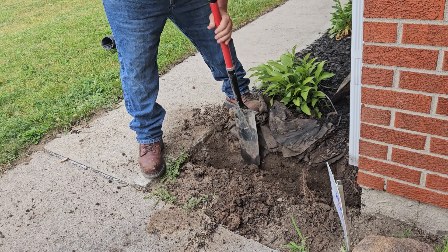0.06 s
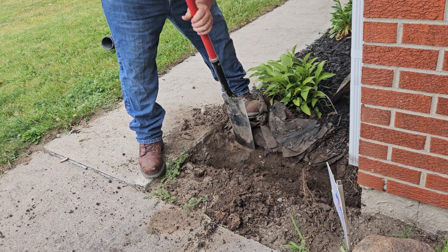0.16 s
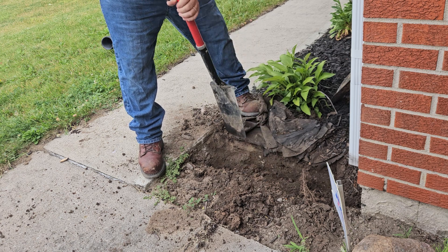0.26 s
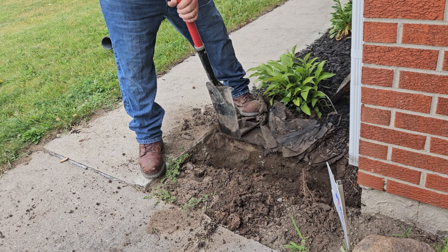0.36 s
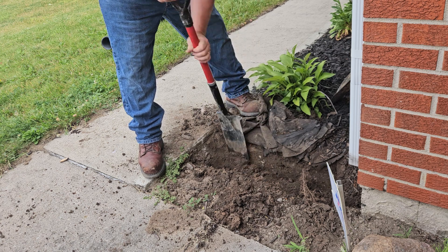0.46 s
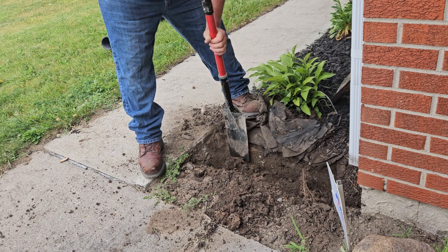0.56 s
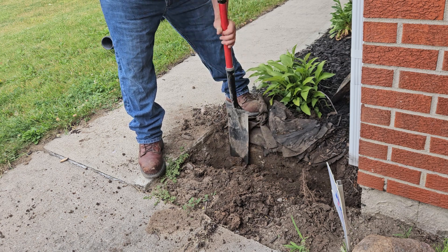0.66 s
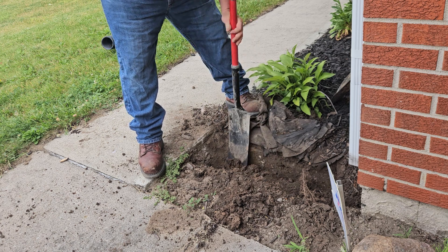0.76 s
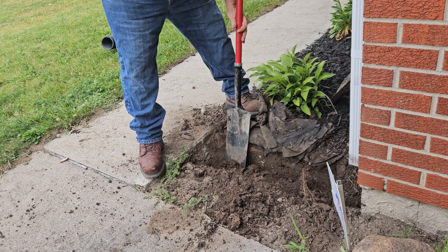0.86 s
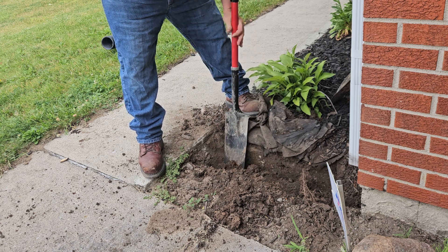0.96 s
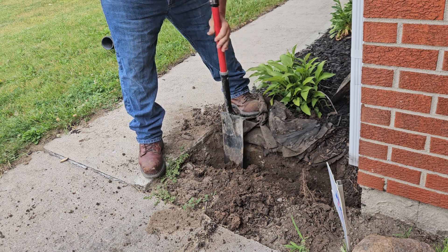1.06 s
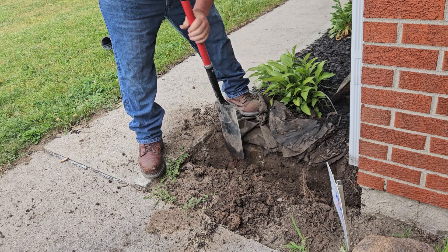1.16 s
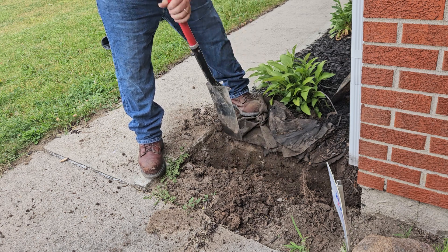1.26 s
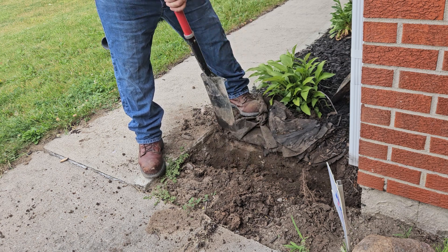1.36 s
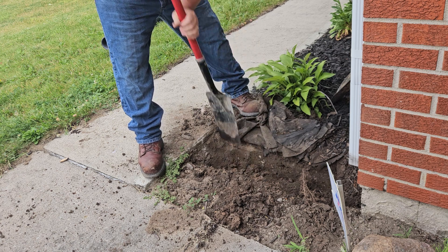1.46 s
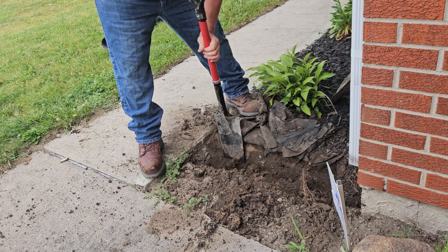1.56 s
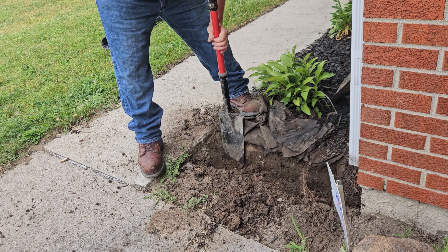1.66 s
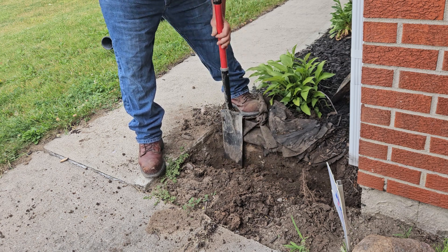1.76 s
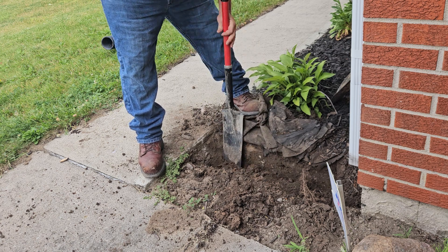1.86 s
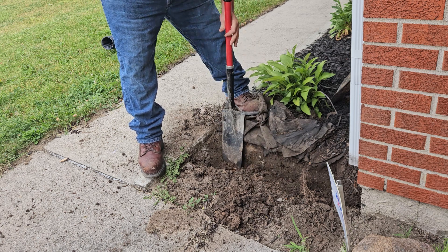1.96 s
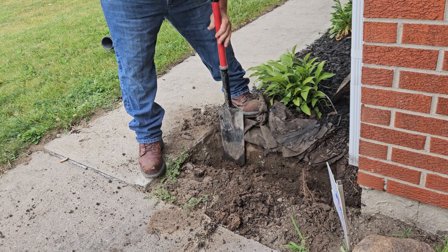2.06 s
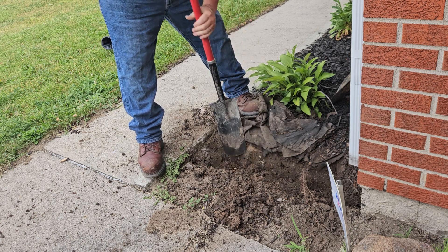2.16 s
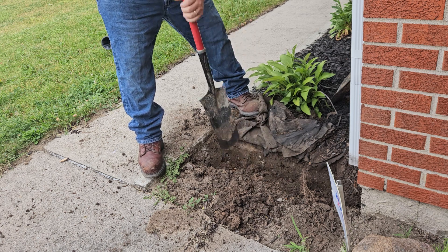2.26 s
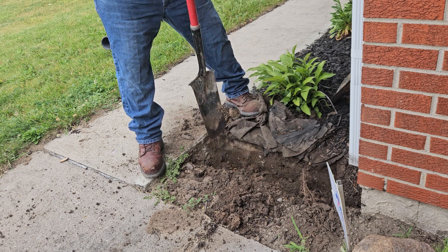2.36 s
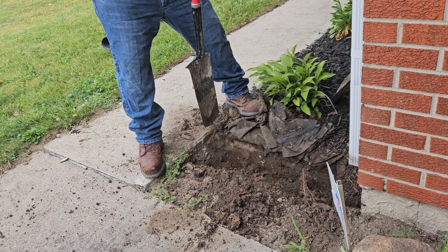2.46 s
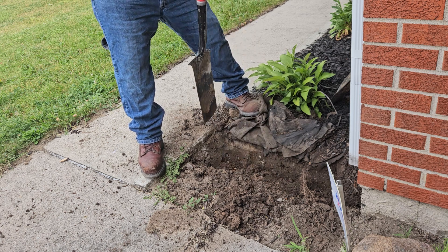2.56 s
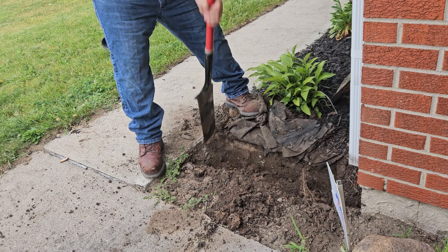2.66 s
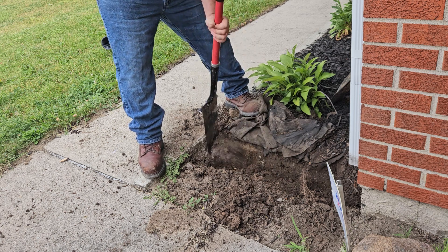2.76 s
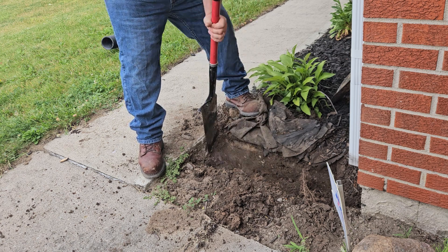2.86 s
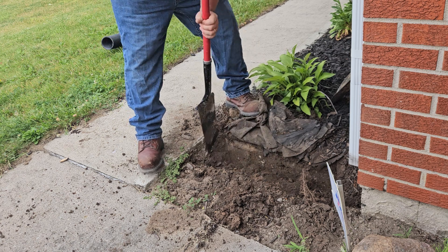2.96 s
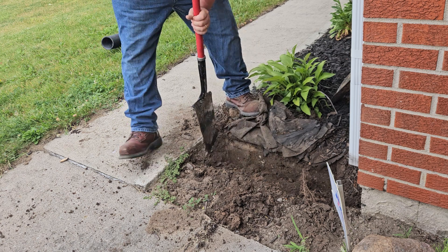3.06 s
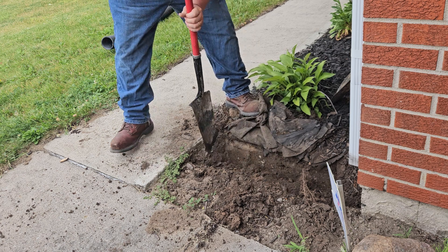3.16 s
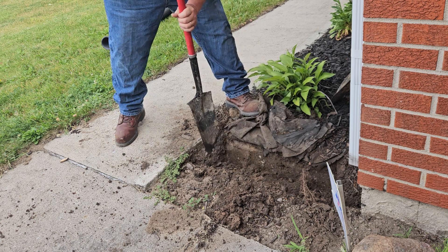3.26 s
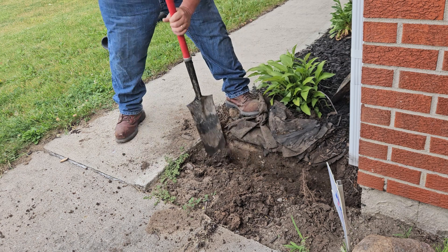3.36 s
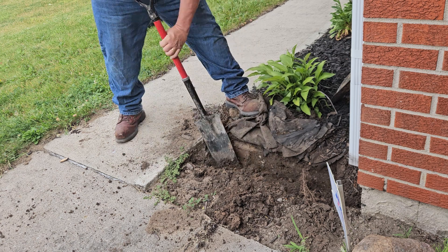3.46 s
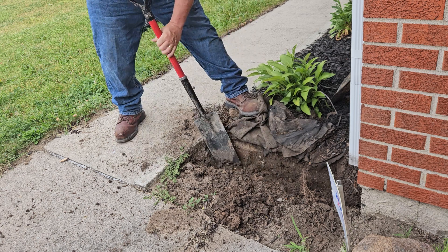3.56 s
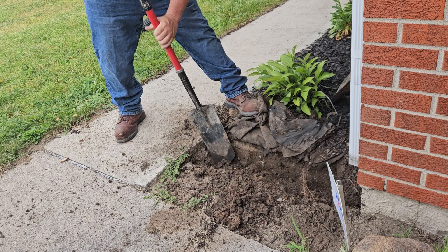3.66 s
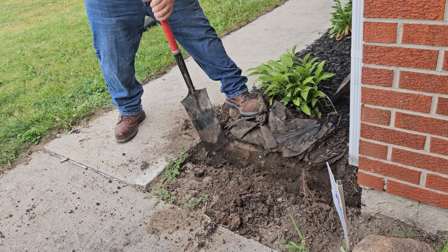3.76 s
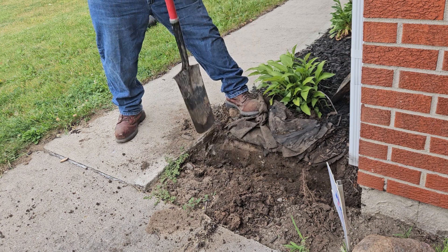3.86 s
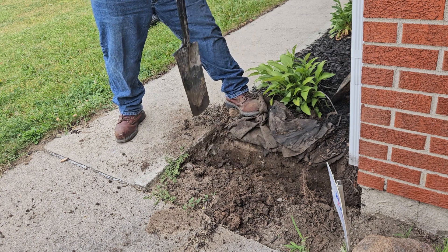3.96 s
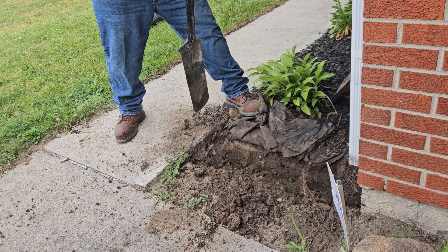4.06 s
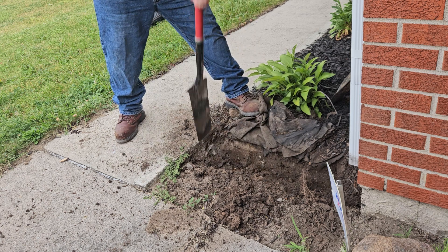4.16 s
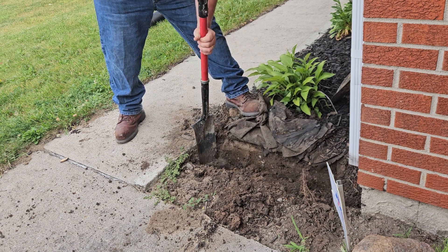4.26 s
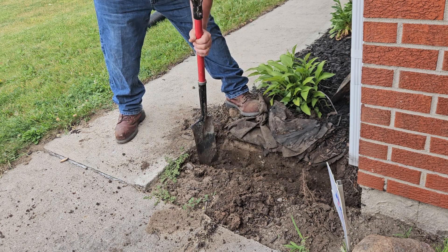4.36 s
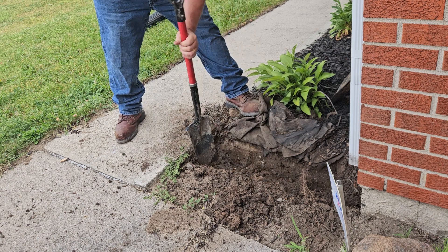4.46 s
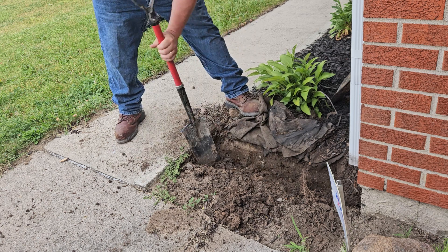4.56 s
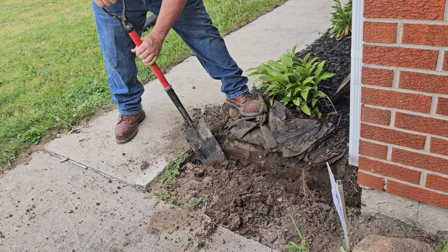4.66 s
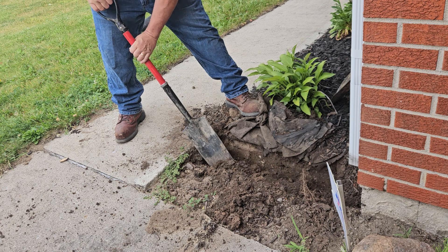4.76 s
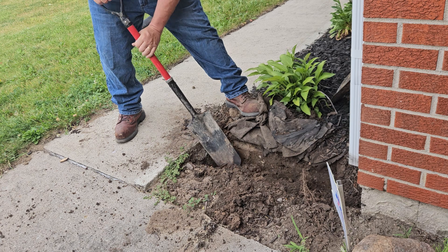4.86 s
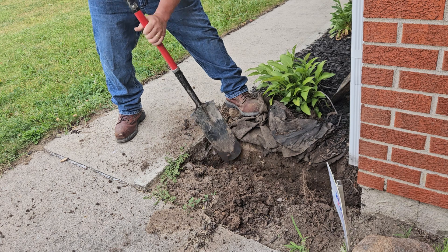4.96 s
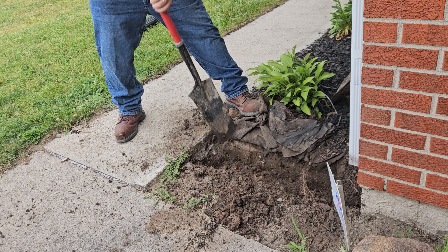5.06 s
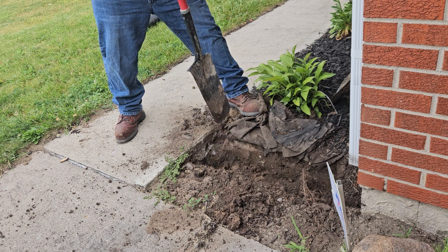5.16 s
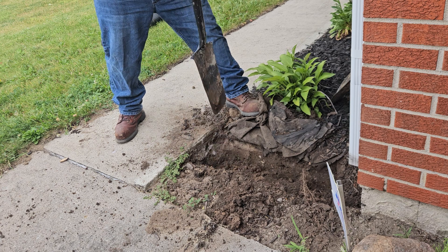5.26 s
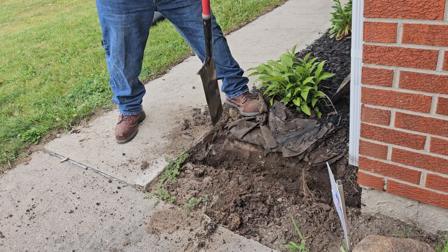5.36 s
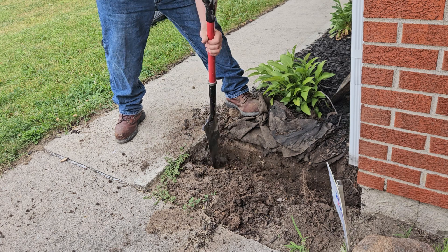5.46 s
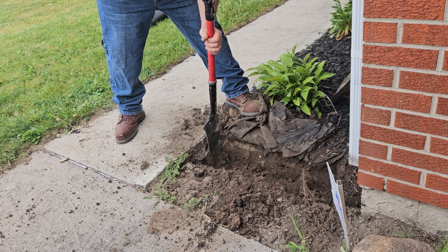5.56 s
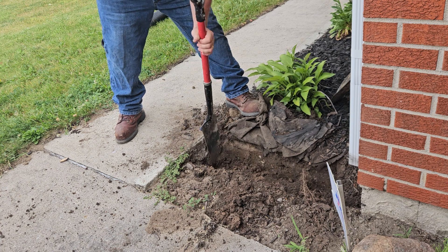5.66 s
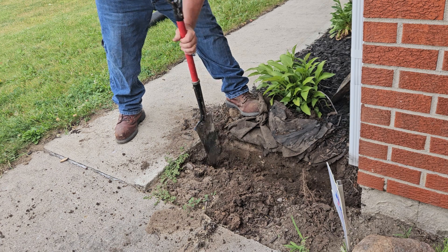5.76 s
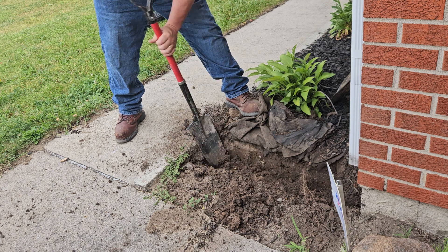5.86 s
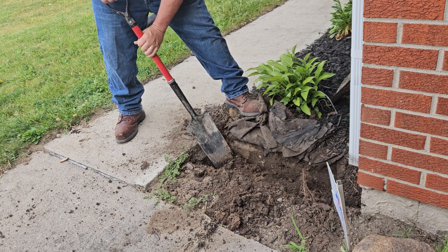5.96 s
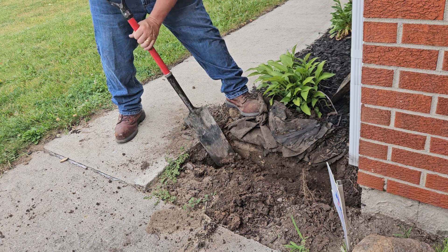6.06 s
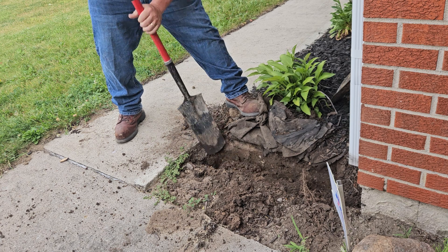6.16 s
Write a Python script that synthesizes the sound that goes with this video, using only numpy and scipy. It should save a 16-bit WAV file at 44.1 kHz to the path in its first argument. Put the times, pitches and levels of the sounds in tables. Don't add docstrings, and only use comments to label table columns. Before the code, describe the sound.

Five hard spade strikes in gritty soil, heard close up in stereo. The blade clanks briefly and dryly, stones tick against its edge, and the earth thumps beneath. Between strikes come small irregular scrapes, slips and crumbling soil, with quiet gaps. Two or three quick hoarse bird chirps appear midway, over soft fading traffic hiss, light leaf rustle and a barely audible hum.

```python
import sys
import numpy as np
from scipy import signal
from scipy.fft import rfft, irfft, next_fast_len
from scipy.io import wavfile
from scipy.ndimage import uniform_filter1d, map_coordinates

SR = 44100
rng = np.random.default_rng(int(sys.argv[2]) if len(sys.argv) > 2 else 0)


def dump(signal):
    limited = np.clip(np.atleast_2d(signal).T, -1, 1)
    pcm = np.round(limited * 32767).astype(np.int16)
    wavfile.write(sys.argv[1], SR, pcm)


def gain_from_db(level_db):
    decades = np.asarray(level_db, float) / 20
    return 10 ** decades


N = 273420

# time_s, level_db
ROAD_LEVEL = [(0, -55), (.64, -55), (2.95, -59.5), (3.38, -64.5), (3.899, -60.5), (4.37, -65.5),
              (4.7, -64.5), (5.13, -67), (6.2, -64)]
# frequency_hz, density_db
RUMBLE_SPECTRUM = [(12, -32), (20, -3.5), (107, -5), (140, -10.5), (201, -11), (222, -16.5), (296, -23.5),
                   (327, -21.5), (400, -35), (520, -64), (880, -120)]
# frequency_hz, density_db
HISS_SPECTRUM = [(150, -43), (250, -11.5), (334, -13.5), (516, -14), (555, -13), (821, -9), (909, -7),
                 (2140, -13.5), (2740, -16), (8000, -32), (10400, -75), (17600, -120)]
# frequency_hz, density_db
LEAF_SPECTRUM = [(2350, -31.5), (4000, 0), (5250, -14), (7660, -13.5), (8700, -22), (9440, -40),
                 (10800, -30), (11600, -9), (16000, -12)]
# time_s, level_db
LEAF_LEVEL = [(0, -77.5), (1.5, -74.5), (2.2, -70.5), (2.44, -70), (2.47, -54), (2.51, -70),
              (2.75, -73.5), (4.12, -73), (4.22, -66.5), (5.22, -73.5), (5.3, -88), (6.2, -78.5)]
# frequency_hz, density_db
HAZE_SPECTRUM = [(10600, -120), (11200, -6), (12000, 0), (15500, -2), (16400, -10)]
# pitch_hz, level_db
MACHINE_HUM = [(195, -67.5)]
# frequency_hz, correlation (-1 to 1)
LIKENESS = [(60, 0.99), (180, 0.88), (550, 0.2), (1650, -0.31), (4970, -0.47), (15000, -0.92)]
RUMBLE_DB, RUMBLE_FOLLOWS = -55.5, 0.64

# start_s, length_s, top_hz, held_share, level_db
CHIRPS = [(2.435, 0.063, 5520, 0.34, -50.5), (2.513, 0.059, 4900, 0.15, -50.5),
          (3.762, 0.075, 5380, 0.3, -51), (3.841, 0.07, 4850, .3, -55), (4.177, 0.074, 5500, .38, -52),
          (4.25, 0.045, 4900, .1, -55.5)]
# start_s, length_s, from_hz, to_hz, level_db
PEEPS = [(2.52, 0.043, 3700, 4100, -56), (2.478, .022, 4480, 3700, -58), (3.855, 0.044, 3650, 3820, -60),
         (1.462, 0.12, 5100, 5450, -71), (2.417, 0.086, 6670, 5950, -69), (2.468, 0.13, 5470, 5400, -68.5),
         (2.585, 0.031, 3200, 3050, -62), (2.648, 0.081, 4930, 4700, -70.5), (4.073, .06, 2295, 2144, -75),
         (4.17, 0.09, 6290, 5700, -65), (5.405, .025, 5170, 5340, -81)]
CHIRP_ENDS_HZ, CHIRP_START_DB, CHIRP_DROPPED_DB, CHIRP_END_DB = 3500, -10, -3, -14
DROP_AT, DROP_TAKES = 0.6, 0.12

# start_s, peak_db, t60_s, brightness_db (350-900 Hz re peak)
THUMPS = [(0.544, -30, 0.16, -5.5), (0.801, -50, 0.19, -6), (0.869, -44, 0.12, -4.5),
          (1.602, -24.5, 0.11, -4.5), (1.909, -53.5, 0.37, 4.5), (1.951, -58.5, 0.51, -1),
          (2.219, -66, 0.13, -6), (2.775, -22, 0.15, -6), (3.098, -56, 0.13, -5), (3.301, -48, 0.49, -32),
          (3.348, -40.5, 0.18, -7.5), (3.43, -39, 0.18, -21), (3.471, -45, 0.15, -6),
          (3.509, -59, 0.18, 13), (3.554, -39, 0.079, 3), (4.294, -24.5, 0.15, -6),
          (4.627, -55.5, 0.69, 3.5), (4.707, -45.5, 0.068, 7.5), (4.829, -52.5, 0.18, 1),
          (4.879, -62, 0.33, 8), (5.541, -30, 0.13, -0.5), (5.899, -57.5, 1, 0.5),
          (5.956, -32.5, 0.08, 3.5), (6.088, -69, 0.073, 2)]
# frequency_hz, density_db
GROUND_SPECTRUM = [(35, -36), (60, -12.5), (146, 3.5), (295, -0.5), (380, -12.5), (490, -41.5), (840, -120)]
# frequency_hz, density_db
CLOD_SPECTRUM = [(210, -34.5), (350, -2.5), (845, -1), (950, -9.5), (1240, -32), (2090, -120)]
KNOCK_DB, KNOCK_S = -16, 0.0017

# start_s, peak_db, ring_hz, lower_ring_db (re peak)
BLOWS = [(0.5452, -11, 3900, -17), (0.5597, -4.5, 3170, -26.5), (0.5673, -10.5, 3260, -27),
         (1.599, -10.5, 3940, -10), (1.605, -7.5, 3440, -10), (1.6129, -5, 2650, -11),
         (1.6193, -8.5, 3870, -12.5), (2.775, -3, 8550, -5.5), (2.7834, -2, 4400, -15.5),
         (2.7863, -5.5, 3800, -21), (2.7893, -4, 7060, -19), (4.2921, 0, 4260, -17.5),
         (4.295, -2.5, 3210, -7.5), (4.2958, -8, 6560, -4), (4.307, -3, 5760, -21.5),
         (5.5402, -4.5, 6770, -21), (5.542, -4, 3740, -14), (5.5535, -8, 6560, -13)]
# start_s, peak_db, ring_hz, lower_ring_db (re peak)
STONES = [(.219, -29.5, 3580, -23), (2.2086, -25.5, 3480, -15), (4.833, -35, 6440, -8),
          (5.9577, -31, 2000, 8), (5.679, -38, 5000, -20), (0.661, -22, 3580, -25),
          (0.6858, -24, 3660, -18), (0.7062, -22, 4750, -17), (0.7261, -22, 4900, -16),
          (0.8034, -31, 3150, 9), (.841, -25, 8700, -10), (0.8659, -28, 3170, 5), (0.877, -20.5, 3120, -6),
          (1.7444, -32.5, 3840, -18), (1.9116, -24, 8550, -22), (1.945, -25, 4700, -22),
          (2.2108, -20.5, 5000, -32), (5.8963, -29, 6100, -22), (3.1341, -18, 7030, -28),
          (3.2348, -17, 6770, -40), (3.3196, -20.5, 4940, -8), (3.4226, -30, 4960, -7.5),
          (3.3688, -36, 2730, -6), (3.3953, -35, 5110, -15), (1.9335, -29.5, 2380, 4.5),
          (2.258, -27.5, 3680, -7.5), (3.447, -21.5, 5200, -11), (3.459, -15, 7000, -4),
          (3.4628, -19, 3020, -4), (5.9795, -26, 3290, -6), (1.8455, -27.5, 4500, -21),
          (3.555, -17.5, 4790, 1.5), (3.6709, -33, 6390, -22), (3.7719, -36.5, 3700, -24),
          (4.629, -22.5, 3200, -5.5), (4.6708, -30.5, 3340, -20), (4.7264, -26.5, 3510, -3),
          (5.6888, -31.5, 3200, -25), (5.9686, -20.5, 2900, -0.5), (6.0912, -29, 3450, -4.5),
          (1.9879, -29, 7060, -22)]
CATCH_DB, CATCH_HZ, CATCH_SPREAD, CATCH_LOW_DB = 9, 3700, 0.096, -20.5
CARRY_ON_S = 0.005

# start_s, grit_db, rise_s, hold_s, ring_db (re grit)
STABS = [
    (0.5432, -20.5, 0.0094, 0.012, -8),
    (1.594, -20.5, 0.0085, 0.018, -4.5),
    (2.7758, -15, 0.013, 0.0081, -9.5),
    (4.2892, -17, 0.00206, 0.02, -6),
    (5.538, -21.5, 0.0013, 0.02, -5.5),
]
# start_s, grit_db, rise_s, ring_db (re grit)
SLIPS = [(0, -52, .001, -5), (0.217, -45.5, 0.0012, -8), (0.4639, -36.5, .003, -17),
         (0.655, -36.5, .013, -11.5), (.704, -39, 0.0042, -8), (0.684, -41, .004, -10),
         (.724, -38, 0.005, -9), (0.8394, -39.5, 0.0033, -2), (0.865, -41, .003, 1.5),
         (1.699, -41.5, 0.0018, -11), (4.911, -52, .002, -6), (4.948, -60, .002, -1.5),
         (5.039, -78.5, 0.0011, -18), (5.213, -84.5, .001, -20), (2.102, -58, 0.0032, 3),
         (2.7376, -54.5, .002, -5), (3.001, -58.5, .002, -15), (3.0195, -45, .002, -16),
         (3.134, -37.5, .002, -12), (3.217, -48, .008, -13), (4.831, -50.5, .002, 0),
         (5.775, -59.5, 0.018, -5.5), (2.929, -56, 0.0074, -22), (5.679, -49.5, 0.0024, -14),
         (5.933, -41.5, 0.0057, -2), (5.955, -42.5, 0.01, 0.5), (6.06, -57.5, 0.0058, 0)]
# start_s, grit_db, hold_s, sag_db (over the hold), ring_db (re grit)
LEVERS = [(.7567, -38, 0.05, -1, -7.5), (0.87, -35.5, 0.045, 8.5, -7.5), (0.989, -53.5, 0.039, -4, 0),
          (1.117, -62.5, 0.037, 0, 3), (1.162, -55, 0.052, 10, 1.5), (1.735, -38.5, 0.022, -4, -16),
          (1.756, -35.5, 0.026, 5, -9.5), (4.864, -47, 0.064, 11.5, -1.5), (1.715, -51, 0.014, 3, -3.5),
          (1.836, -40, 0.019, 1, -12), (.04, -68.5, 0.19, 4, 6), (1.892, -37, 0.012, 15, -10),
          (1.916, -42, 0.07, 7, -5), (2.204, -42.5, 0.062, 6.5, -3), (3.047, -44, 0.037, -1.5, -8),
          (3.228, -42, 0.12, 2, -11), (3.346, -53, 0.14, 1, -6), (3.443, -43, 0.011, -3, 2.5),
          (3.457, -31, 0.025, -5, -8), (3.489, -32.5, 0.073, 5.5, -8), (3.633, -61, 0.16, -6, -3),
          (4.407, -65.5, .1, -2.5, -9.5), (4.514, -46.5, 0.074, -2, -11), (4.623, -42, 0.034, 4, -4.5),
          (4.669, -43.5, 0.066, 3, -5), (2.041, -69.5, 0.19, 1.5, 1.5), (5.802, -43, 0.056, 0, -15.5),
          (5.882, -54, 0.038, -7.5, -4.5), (5.974, -36.5, 0.011, 5, -14), (6.083, -45, 0.019, -0.5, -10)]
RISE_DB_PER_S, RELEASE_DB_PER_S, RING_RELEASE_DB_PER_S, LEVER_RISE_S = 519, 370, 293, 0.003
STAB_RISE_DB_PER_S, STAB_SAG_DB, STAB_RELEASE_DB_PER_S = 405.5, 3.5, 639.5
TOUCH_DB, TOUCH_DB_PER_S = -18.5, 1199
CRUMBS_DB, CRUMBS_DB_PER_S = -17, 189
# frequency_hz, width_hz, level_db
BLADE_MODES = [(3050, 16, -9), (3704, 83, 7.5), (4610, 16, -8), (4790, 29, 10.5), (5200, 100, -19.5),
               (5960, 400, -6.5), (6390, 43, -14), (7240, 29, 1), (7330, 94, 1.5), (8100, 19, -12),
               (8030, 16, 2.5), (9120, 39, 7)]
# frequency_hz, width_hz, level_db
BOWL_MODES = [(1155, 340, -0.5), (1220, 208, 4.5), (1536, 99, 1.5), (1794, 130, -1), (2212.4, 100, -1),
              (2239, 47, 4)]
# frequency_hz, density_db
GRIT_SPECTRUM = [(880, -17), (1500, -22), (1690, 0), (1980, -13.5), (2470, -7), (3340, 0.5), (3650, 4.5),
                 (4420, -5), (7280, -2), (9640, -14), (12200, -3), (15400, -8.5), (16400, -20.5)]

# frequency_hz, t60_s
WALL_DECAY = [(200, 0.028), (2000, 0.081), (10000, 0.093)]
# frequency_hz, left_minus_right_db
PORT_DB = [(60, -.5), (110, -1.5), (200, -2), (380, -1.5), (700, -1), (1290, 0), (2380, 1.5), (4400, 4.5),
           (8120, -7), (15000, -8)]
# frequency_hz, left_lead_rad
PORT_LEAD = [(100, 0), (600, -.3), (1200, -1), (2000, .6), (3600, -1), (4600, -.4), (6000, -1.5),
             (8000, -2), (10500, .9), (12500, -1.5), (15000, -1)]
WALL_DB, TOP_HZ = -2.5, 15800
DIP_HZ, DIP_WIDTH_HZ, DIP_DEPTH = 9270, 260, 0.25


def unit(x):
    return x / np.sqrt(np.mean(x ** 2) + 1e-20)


def along(points, hz):
    f, v = np.transpose(points)
    return np.interp(np.log(hz + 1), np.log(f + 1), v)


def wobble(rate):
    knots = rng.standard_normal(int(N * rate / SR) + 4)
    return map_coordinates(knots, [np.arange(N) * rate / SR])


def filtered(x, response):
    m = next_fast_len(N + SR // 2)
    gain = response(np.fft.rfftfreq(m, 1 / SR))
    gain = gain / np.sqrt(np.mean(np.abs(gain) ** 2))
    return irfft(rfft(x, m) * gain, m)[..., :N]


def causal(points):
    def response(hz):
        cepstrum = irfft(np.log(np.maximum(gain_from_db(along(points, hz)), 1e-4)))
        half = len(cepstrum) // 2
        cepstrum[1:half] *= 2
        cepstrum[half + 1:] = 0
        return np.exp(rfft(cepstrum))
    return response


def modes(table, damping):
    def response(f):
        total = 0
        for k, (centre, width, db) in enumerate(table):
            loss = 1j * f * width * damping
            total = total + (-1) ** k * gain_from_db(db) * loss / (centre * centre - f * f + loss)
        return total
    return response


def patches(x, size, depth_db, tall=4, long=6):
    z = signal.stft(x, nperseg=size)[2]
    field = uniform_filter1d(rng.standard_normal(z.shape[-2:]), tall, axis=0)
    field = uniform_filter1d(field, long, axis=1)
    return signal.istft(z * gain_from_db(depth_db * unit(field)), nperseg=size)[1][..., :N]


def rush(spectrum, patchy_db):
    pair = patches(rng.standard_normal((2, N)), size=512, depth_db=patchy_db)

    def response(hz):
        turn = np.arccos(np.clip(along(LIKENESS, hz), -1, 1)) / 2
        return gain_from_db(along(spectrum, hz)) * [np.cos(turn), np.sin(turn)]
    mid, side = filtered(pair, response)
    return unit(np.array([mid + side, mid - side]))


def traffic():
    time_s, road_db = np.transpose(ROAD_LEVEL)
    rumble_db = RUMBLE_DB + RUMBLE_FOLLOWS * (road_db - road_db.mean())
    t = np.arange(N) / SR
    rumble = gain_from_db(np.interp(t, time_s, rumble_db) + 1.8 * wobble(6.7)) * rush(RUMBLE_SPECTRUM, patchy_db=1.0)
    hiss = gain_from_db(np.interp(t, time_s, road_db) + 0.49 * wobble(1.8)) * rush(HISS_SPECTRUM, patchy_db=-0.5)
    leaf_db = np.interp(t, *np.transpose(LEAF_LEVEL))
    leaves = gain_from_db(leaf_db + 1.8 * wobble(40)) * rush(LEAF_SPECTRUM, patchy_db=0.5)
    hum = np.zeros(N)
    for hz, db in MACHINE_HUM:
        phase = 2 * np.pi * hz * t + 0.52 * wobble(5.8)
        hum += gain_from_db(db + 3.5 + 1.2 * wobble(6.4)) * np.sin(phase)
    haze = gain_from_db(-86 + 3 * wobble(3)) * rush(HAZE_SPECTRUM, patchy_db=2)
    return rumble + hiss + leaves + hum + haze


def notes():
    glides = []
    for s, length, top_hz, held, db in CHIRPS:
        shares = np.array([0, DROP_AT - held, DROP_AT, DROP_AT + DROP_TAKES, 1])
        pitch_hz = [CHIRP_ENDS_HZ, top_hz, top_hz, CHIRP_ENDS_HZ, 1.1 * CHIRP_ENDS_HZ]
        level_db = db + np.array([CHIRP_START_DB, -1, 0, CHIRP_DROPPED_DB, CHIRP_END_DB])
        glides.append((s + length * shares, pitch_hz, level_db))
    for s, length, from_hz, to_hz, db in PEEPS:
        pitch_hz = [from_hz, (from_hz + to_hz) / 2, to_hz]
        glides.append((s + length * np.array([0, 0.5, 1]), pitch_hz, db + np.array([1, 0, 1])))
    return glides


def sparrows():
    song = np.zeros(N)
    waver, flutter_db = 1 + 0.028 * wobble(600), 5 * wobble(200)
    for s, hz, db in notes():
        at = np.arange(round(s[0] * SR), round(s[-1] * SR))
        t = at / SR
        phase = 2 * np.pi * np.cumsum(np.interp(t, s, hz) * waver[at]) / SR
        fade = np.clip(np.minimum(t - s[0], s[-1] - t) / 0.0037, 0, 1)
        song[at] += fade * gain_from_db(np.interp(t, s, db) + flutter_db[at]) * np.sin(phase)
    return song


def thumps():
    deep, clods = np.zeros((2, N + SR))
    t = np.arange(SR // 4) / SR
    for s, db, t60, bright_db in THUMPS:
        at = slice(round(s * SR), round(s * SR) + len(t))
        envelope = gain_from_db(db - 1.0 - 60 * t / max(t60, 0.02)) * (1 - np.exp(-t / 0.0054))
        push = envelope * rng.standard_normal(len(t))
        knock = gain_from_db(db + KNOCK_DB) * t / KNOCK_S * np.exp(1 - t / KNOCK_S)
        deep[at] += push + knock
        clods[at] += gain_from_db(bright_db) * push
    return filtered(deep[:N], causal(GROUND_SPECTRUM)) + filtered(clods[:N], causal(CLOD_SPECTRUM))


def steel(force):
    gripped = patches(force, size=256, depth_db=3.5, tall=3, long=12)
    direct = filtered(force, causal(GRIT_SPECTRUM))
    return direct + gain_from_db(-10) * filtered(gripped, modes(BLADE_MODES, damping=3))


def bowl(force):
    gripped = patches(force, size=512, depth_db=3.5, tall=2, long=8)
    return filtered(gripped, modes(BOWL_MODES, damping=1.3))


def contacts():
    stabs = [(s, db, rise, STAB_RISE_DB_PER_S * rise, hold, STAB_SAG_DB, STAB_RELEASE_DB_PER_S, ring)
             for s, db, rise, hold, ring in STABS]
    slips = [(s, db, rise, RISE_DB_PER_S * rise, 0, 0, RELEASE_DB_PER_S, ring)
             for s, db, rise, ring in SLIPS]
    levers = [(s, db, LEVER_RISE_S, RISE_DB_PER_S * LEVER_RISE_S, hold, sag, RELEASE_DB_PER_S, ring)
              for s, db, hold, sag, ring in LEVERS]
    return stabs, slips + levers


def catches():
    scrapes = contacts()[1]
    pitch_hz = CATCH_HZ * np.exp(CATCH_SPREAD * rng.standard_normal(len(scrapes)))
    caught = []
    for (s, db, _, rise_db, *_), hz in zip(scrapes, pitch_hz):
        carries_on = any(row[0] < s < row[0] + row[2] + row[4] + CARRY_ON_S for row in scrapes)
        if not carries_on:
            caught.append((max(s, 0), db - rise_db + CATCH_DB, hz, CATCH_LOW_DB))
    return caught


def clinks():
    force, low, ring = np.zeros((3, N + SR))
    t = np.arange(SR // 8) / SR
    for s, db, hz, low_db in BLOWS + STONES + catches():
        blow = round((s + 0.0005) * SR)
        at = slice(blow, blow + len(t))
        noise = rng.standard_normal(len(t))
        rattle = gain_from_db(db - 11 - 60 * t / 0.02) * noise + gain_from_db(db - 5 - 60 * t / 0.001) * np.sign(noise)
        force[at] += rattle
        low[at] += gain_from_db(low_db + 1.0) * rattle
        onset = 1 - np.exp(-t / 0.00023)
        ring[at] += gain_from_db(db - 4.0 - 60 * t / 0.01) * np.sin(2 * np.pi * hz * t) * onset
    return steel(force[:N]) + filtered(low[:N], modes(BOWL_MODES, damping=2.5)) + ring[:N]


def crunch(spiky_db, lumpy_db):
    clumps = patches(rng.standard_normal(N), size=128, depth_db=1.2)
    return unit(clumps * gain_from_db(spiky_db * wobble(1500) + lumpy_db * wobble(90)))


def strokes():
    grit, ring = np.zeros((2, N + SR))
    t = np.arange(SR // 3) / SR
    stabs, scrapes = contacts()
    for s, db, rise, rise_db, hold, sag_db, release, ring_db in stabs + scrapes:
        rise, hold = max(rise, 1 / SR), max(hold, 1 / SR)
        held_db = db + np.interp(t, [0, rise, rise + hold], [-rise_db, 0, -sag_db])
        after = np.maximum(t - rise - hold, 0)
        start = max(round(s * SR), 0)
        at = slice(start, start + len(t))
        crumbs = gain_from_db(held_db + CRUMBS_DB - CRUMBS_DB_PER_S * after)
        grit[at] = np.maximum(grit[at], gain_from_db(held_db - release * after) + crumbs)
        ring_release = release * RING_RELEASE_DB_PER_S / RELEASE_DB_PER_S
        ring[at] = np.maximum(ring[at], gain_from_db(held_db + ring_db - ring_release * after))
    for s, db, *_ in STABS:
        at = slice(round(s * SR) - len(t), round(s * SR))
        touch = gain_from_db(db + TOUCH_DB - TOUCH_DB_PER_S * t[::-1])
        grit[at] = np.maximum(grit[at], touch)
    force = crunch(spiky_db=2.9, lumpy_db=1)
    return gain_from_db(1.5) * steel(grit[:N] * force) + bowl(ring[:N] * force)


def echoes(x, t60_scale, delay_s):
    hz, t, z = signal.stft(rng.standard_normal((2, SR // 4)), SR, nperseg=128)
    decay = gain_from_db(-60 * t / (t60_scale * along(WALL_DECAY, hz)[:, None]))
    tail = signal.istft(z * decay, SR, nperseg=128)[1]
    late = np.pad(x, (round(delay_s * SR), 0))[None]
    return signal.fftconvolve(late, tail / np.linalg.norm(tail[0]), axes=1)[:, :N]


def ports(x):
    side = np.array([[0.5], [-0.5]])
    pair = np.array([patches(x, size=64, depth_db=3, tall=2, long=10) for _ in range(2)])

    def response(hz):
        return gain_from_db(side * along(PORT_DB, hz)) * np.exp(1j * side * along(PORT_LEAD, hz))
    return filtered(pair, response)


def scene():
    background, birds, ground = traffic(), sparrows(), thumps()
    spade = strokes() + clinks()
    turn = np.cumsum(np.abs(wobble(4))) * 8 / SR
    wall = echoes(spade * np.cos(turn), t60_scale=0.58, delay_s=0.002)
    wall = wall + echoes(spade * np.sin(turn), t60_scale=0.79, delay_s=0.0028)
    below = ground * gain_from_db([[-0.5], [0.5]]) + gain_from_db(-20) * echoes(ground, t60_scale=1, delay_s=0.003)
    far = gain_from_db(-8) * birds + echoes(birds, t60_scale=1.2, delay_s=0.004)
    return ports(spade) + gain_from_db(WALL_DB) * wall + below + gain_from_db(2.1) * far + background


def roll_off(x):
    return signal.sosfilt(signal.butter(12, 16520, fs=SR, output="sos"), x)


def record(dry):
    topped = np.clip(dry, -0.7, 0.7)
    b, a = signal.iirpeak(DIP_HZ, DIP_HZ / DIP_WIDTH_HZ, fs=SR)
    dipped = topped - DIP_DEPTH * signal.lfilter(b, a, topped)
    edge = signal.ellip(10, 0.5, 70, TOP_HZ, fs=SR, output="sos")
    finished = signal.sosfilt(edge, dipped)
    return roll_off(finished)


dry = scene()
out = record(dry)
dump(out)
```